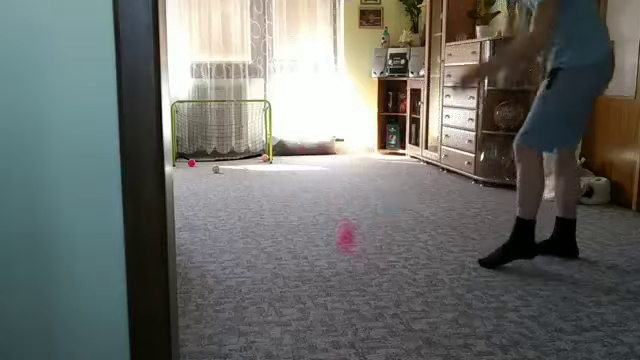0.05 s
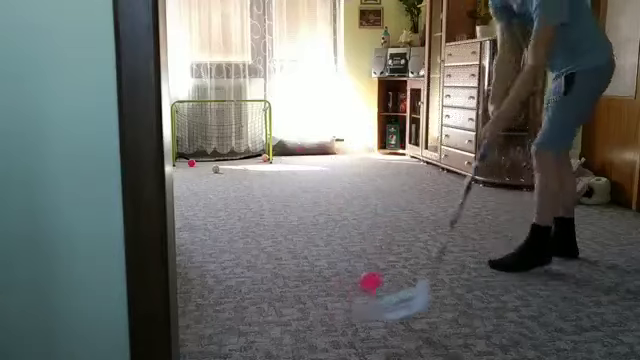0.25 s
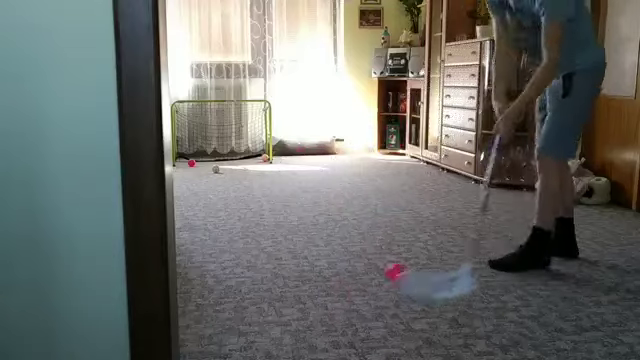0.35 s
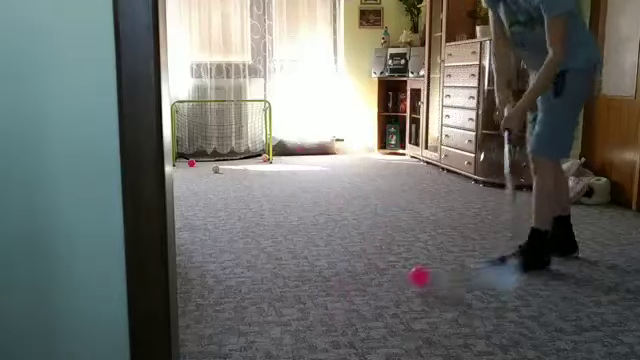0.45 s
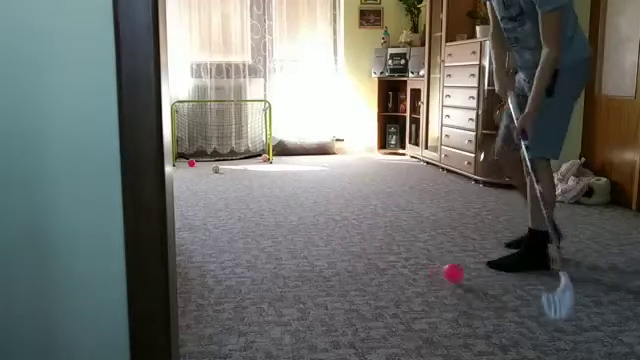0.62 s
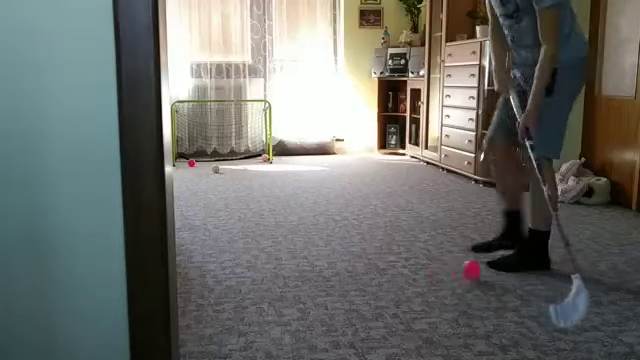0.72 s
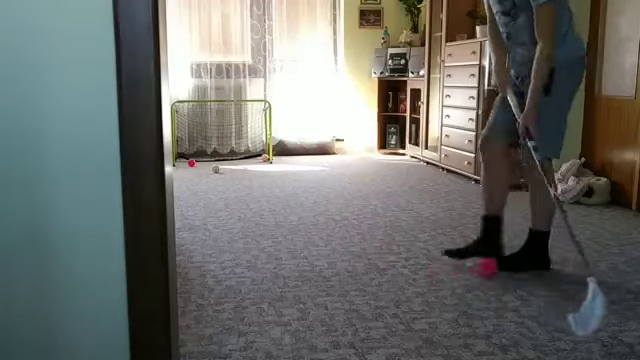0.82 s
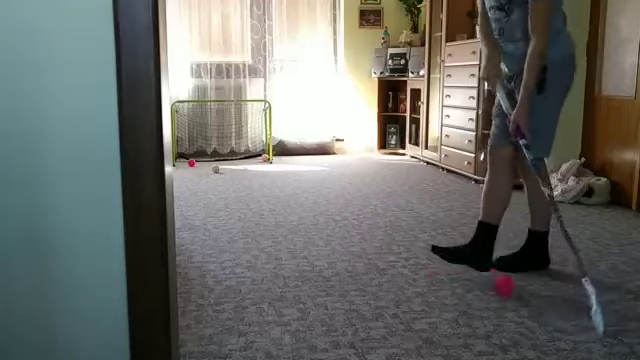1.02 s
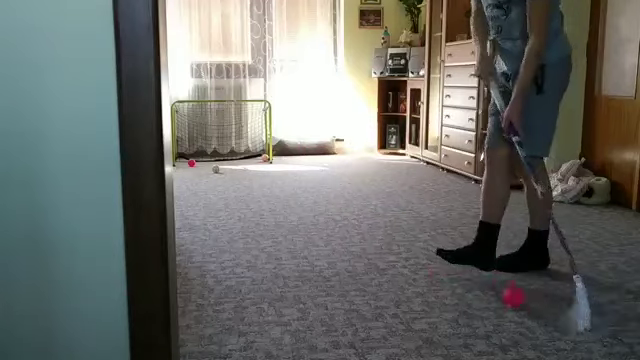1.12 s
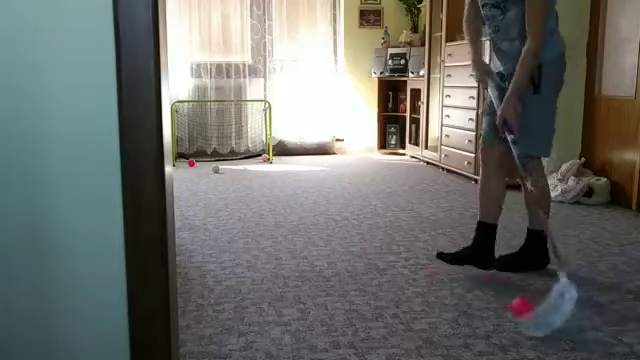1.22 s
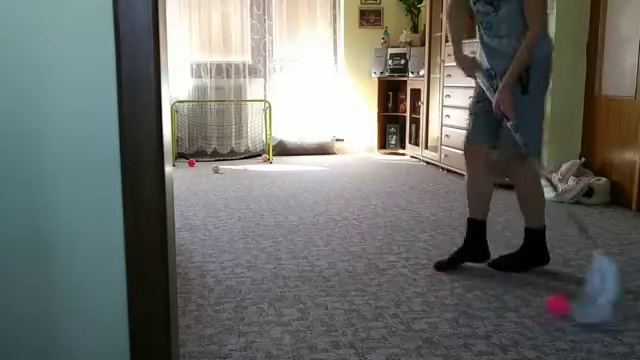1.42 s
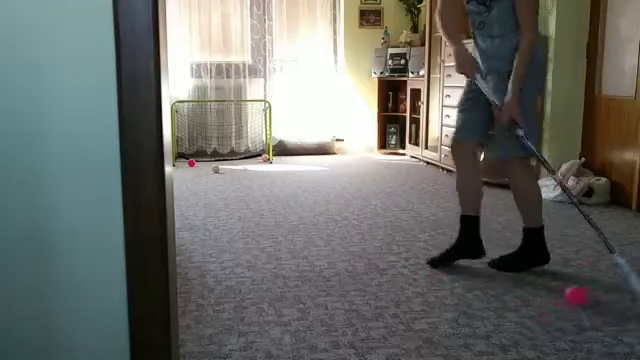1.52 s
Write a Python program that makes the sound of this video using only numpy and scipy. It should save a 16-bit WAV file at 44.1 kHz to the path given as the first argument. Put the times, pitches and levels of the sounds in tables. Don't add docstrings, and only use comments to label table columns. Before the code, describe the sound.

A plastic stick blade thuds on carpet and sharply cracks a light hollow ball; socked feet pad and scuff, then a far quieter tap follows, in a furnished living room, heard from a few metres by a phone.

```python
import sys
import numpy as np
from scipy import signal
from scipy.fft import rfft, irfft
from scipy.io import wavfile
from scipy.ndimage import uniform_filter1d

SR = 44100
rng = np.random.default_rng(int(sys.argv[2]) if len(sys.argv) > 2 else 0)


def ratio_of_db(decibels):
    return 10 ** (np.asarray(decibels, float) / 20)


def wrap_up_sound(samples):
    columns = np.atleast_2d(samples).T
    tamed = np.clip(columns, -1, 1)
    steps = np.round(tamed * 32767).astype(np.int16)
    wavfile.write(sys.argv[1], SR, steps)


N = 68355

CRACK_S, TAP_S = .2616, 1.3946
BALL_PAN_DB = 6


def curve(table, hz):
    table = np.array(table, float)
    return np.interp(np.log(np.maximum(hz, 1)), np.log(table[:, 0]), table[:, 1])


def level(x, db):
    return x * ratio_of_db(db) / np.sqrt(np.mean(x ** 2))


def colour(table, size=4096):
    half = size // 2
    log_gain = curve(table, np.arange(half + 1) * SR / size) * np.log(10) / 20
    cepstrum = irfft(log_gain)
    cepstrum[1:half] *= 2
    cepstrum[half + 1:] = 0
    click = irfft(np.exp(rfft(cepstrum)))[:half]
    return click / np.abs(click).max()


def shaped(x, table):
    return irfft(rfft(x) * ratio_of_db(curve(table, np.arange(N // 2 + 1) * SR / N)), N)


def place(x, s):
    y = np.zeros(N)
    y[:len(x)] = x
    return irfft(rfft(y) * np.exp(-2j * np.pi * np.arange(N // 2 + 1) * s * SR / N), N)


def pan(db):
    return ratio_of_db(np.array([[db], [-db]]) / 2)


def walk(rate):
    hold = int(SR / rate)
    steps = np.repeat(rng.standard_normal(N // hold + 1), hold)
    return 1.3 * uniform_filter1d(uniform_filter1d(steps, hold), hold)[:N]


# (frequency [Hz], correlation [-1 to 1])
ROOM_LIKENESS = [(60, 0.73), (250, 0.93), (500, 0.62), (1000, 0.3), (2000, 0.038), (16000, 0.065)]


def bands(likeness=None):
    f = np.maximum(np.arange(N // 2 + 1) * SR / N, 1)
    steady_top_hz = 15050
    mid, side = rfft(rng.standard_normal((2, N))) * (f < steady_top_hz)
    for hz in 22 * 2 ** np.arange(0, 10, .5):
        c = np.clip(curve(ROOM_LIKENESS, hz) if likeness is None else likeness, -1, 1)
        pair = np.sqrt((1 + c) / 2) * mid + np.sqrt((1 - c) / 2) * side * np.array([[1], [-1]])
        window = np.cos(np.pi / 2 * np.clip(2 * np.log2(f / hz), -1, 1)) ** 2
        yield hz, irfft(pair * window, N)


# (frequency [Hz], level when cracked [dB], level when tapped [dB], T60 [s])
BALL_MODES = [(499.3, -23.5, -33, .1), (1161, -20.5, -28, 0.049), (2550, -18, -8, .012),
              (3770, -8, -4.5, 0.0049), (4600, -13, -11, 0.0066), (6075, -6, -32, 0.01),
              (8030, -9.5, -4, 0.011), (8710, 0.5, 1, 0.0052), (9550, -8.5, 1, 0.0082)]


def ball_ring(db, column):
    t = np.arange(SR // 5) / SR
    ring = 0
    for mode in BALL_MODES:
        ring = ring + ratio_of_db(mode[column] - 60 * t / mode[-1]) * np.sin(2 * np.pi * mode[0] * t)
    return ratio_of_db(db) * ring


def knock(spectrum, ring_db, column):
    x = ball_ring(ring_db, column)
    click = colour(spectrum)
    x[:len(click)] += click
    return x


# (frequency [Hz], level [dB])
CRACK_SPECTRUM = [(300, -30.5), (800, -8), (2500, -2.5), (3100, -3), (4300, 4), (8800, 3), (12000, 1),
                  (16500, -20)]


def crack():
    return ratio_of_db(-8) * place(knock(CRACK_SPECTRUM, -13.5, column=1), CRACK_S)


# (frequency [Hz], level [dB])
TAP_SPECTRUM = [(90, -29.5), (300, -12), (1030, -8), (1750, -10.5), (4000, -8), (8500, -8), (12000, -8),
                (16500, -27)]


def tap():
    return ratio_of_db(-23.5) * place(knock(TAP_SPECTRUM, -15, column=2), TAP_S)


# (frequency [Hz], level [dB])
SNAP_SPECTRUM = [(1500, -25), (3500, -1), (7500, 5), (12000, -1), (16500, -11)]


def snap():
    edge = colour(SNAP_SPECTRUM)
    x = ratio_of_db(-3) * place(edge, CRACK_S) + ratio_of_db(-26) * place(edge, TAP_S)
    return x * pan(BALL_PAN_DB)


def cavity():
    t = np.arange(SR // 2) / SR
    pitch_hz, rise_s, t60_s = 1045, .005, .16
    waver = .4 * walk(50)[:len(t)]
    hum = np.sin(2 * np.pi * pitch_hz * t + waver)
    hum *= (1 - np.exp(-t / rise_s)) * ratio_of_db(-60 * t / t60_s)
    return ratio_of_db(-40) * place(hum, CRACK_S) + ratio_of_db(-37) * place(hum, TAP_S)


# (frequency [Hz], level [dB])
THUD_SPECTRUM = [(30, -34), (75, -16), (150, -14.5), (260, -2), (400, -3), (540, 1.5), (1000, -12.5),
                 (1600, -16.5), (2100, -24.5), (5000, -63)]


def thud():
    touch_s, rebound_delay_s, rebound_db = .2398, .001745, 9
    dull = colour(THUD_SPECTRUM)
    push = ratio_of_db(rebound_db) * place(dull, touch_s + rebound_delay_s)
    return ratio_of_db(-22) * (push - place(dull, touch_s)) / 2


# (frequency [Hz], level [dB])
WHISTLE_SPECTRUM = [(1800, -30), (2200, -7), (2330, 0), (2460, -7), (3000, -30)]


def whistle():
    t = np.arange(N) / SR
    centre_s, spread_s = .19, .03
    tone = shaped(rng.standard_normal(N), [(20, -90)] + WHISTLE_SPECTRUM + [(9000, -90)])
    return level(tone, -60) * np.exp(-((t - centre_s) / spread_s) ** 2)


# (time [s], level [dB])
FOOTFALLS = [(.11, -48), (0.174, -48), (.53, -45), (.575, -60), (.61, -53.5), (.695, -44.5), (0.769, -60.5),
             (.85, -58), (.948, -46), (1.288, -55), (1.458, -46.5)]
# (frequency [Hz], level [dB])
FOOT_SPECTRUM = [(40, -1), (90, 4), (300, -3), (700, -4.5), (1300, -16), (2500, -59), (6000, -97)]


def footsteps():
    return sum(ratio_of_db(db) * place(colour(FOOT_SPECTRUM), s) for s, db in FOOTFALLS)


# (start [s], rise [s], hold [s], fall T60 [s], level [dB])
BRUSH_STROKES = [
    (0, 0.00054, .03, 0.56, -55),
    (0.072, 0.031, 0.032, 0.26, -59),
    (0.129, 0.06, 0.14, 0.19, -48.5),
    (0.496, 0.026, .01, 1, -55.5),
    (.878, 0.014, 0.049, 0.83, -55.5),
    (0.941, .01, 0.07, 0.3, -58.5),
    (1.264, 0.02, 0.065, 0.34, -61.5),
    (1.488, 0.026, .05, .3, -50.5),
]
# (frequency [Hz], level [dB])
BRUSH_SPECTRUM = [(300, -2), (1200, -0.5), (2400, 4.5), (3200, -2), (8000, 2), (11000, 0), (14700, -7.5)]


def brushes():
    t, power = np.arange(N) / SR, 0
    for start, rise, hold, fall, db in BRUSH_STROKES:
        falling = np.maximum(t - start - rise - hold, 0)
        swell = np.clip((t - start) / rise, 0, 1) ** 2
        power = power + ratio_of_db(2 * db - 120 * falling / fall) * swell
    hiss = sum(b * ratio_of_db(curve(BRUSH_SPECTRUM, hz) + 1.6 * walk(25.14)) for hz, b in bands(.1))
    grain_db = 1
    return np.sqrt(power) * level(hiss * ratio_of_db(grain_db * walk(300)), 0)


# (frequency [Hz], level [dB per Hz])
RUMBLE_SPECTRUM = [(12, -17), (20, 9), (43, -15), (91, -8), (172, -16.5), (301, -12), (387, -13),
                   (566, -16.5), (1500, -24), (1950, -54), (3300, -120)]
# (frequency [Hz], level [dB per Hz])
HISS_SPECTRUM = [(700, -25), (1500, -3.5), (3700, -4), (4350, 4.5), (5500, -8), (8000, -3.5), (11300, 0),
                 (12500, -9.5), (15000, -5.5)]
# (frequency [Hz], rms level [dB])
HUM_TONES = [(301, -72), (587, -74), (1297, -78.5), (1820, -85)]


def background():
    t, swell = np.arange(N) / SR, walk(3.8)
    swell_db, flicker_db = 1, 2
    rumble = sum(b * ratio_of_db(swell_db * swell + flicker_db * walk(11.67)) for hz, b in bands())
    hiss = sum(b * ratio_of_db(2.4 * walk(10.56)) for hz, b in bands(0))
    hum = sum(ratio_of_db(db) * np.sqrt(2) * np.sin(2 * np.pi * f * t + walk(5.83)) for f, db in HUM_TONES)
    return level(shaped(rumble, RUMBLE_SPECTRUM), -59) + level(shaped(hiss, HISS_SPECTRUM), -61) + hum


# (frequency [Hz], T60 [s])
ROOM_DECAY = [(60, 0.72), (170, 0.58), (400, 0.49), (1000, 0.52), (2700, 0.39), (5500, 0.34), (11000, 0.26),
              (16000, 0.27)]
# (frequency [Hz], left over right [dB])
ROOM_LEAN = [(60, 2), (250, -1), (1000, -3.5), (4000, -2), (8000, 0.5), (14000, 1.5)]


def room(x, wet_db, pan_db, near_db=-14.5, build_s=.017):
    t = np.arange(N) / SR
    tail = 0
    for hz, b in bands():
        tail = tail + b * ratio_of_db(-60 * t / curve(ROOM_DECAY, hz)) * pan(curve(ROOM_LEAN, hz))
    sparse_db, sparse_s = 4, .032
    lumps = ratio_of_db(sparse_db * np.exp(-t / sparse_s) * np.array([walk(900), walk(900)]))
    echo = tail * lumps * np.sqrt(1 - np.exp(-t / build_s)) * ratio_of_db(wet_db)
    first_echo_s, near_t60_s = .0001, .011
    near = ratio_of_db(near_db - 60 * t / near_t60_s) * rng.standard_normal((2, N)) * (t > first_echo_s)
    near[:, 0] = 1
    near[1] = np.roll(near[1], shift=3)
    echo += near * pan(pan_db)
    return signal.fftconvolve(x[None], echo, axes=1)[:, :N]


def scene():
    soft_near_db = -30
    mix = room(crack(), -14, BALL_PAN_DB)
    mix += room(tap(), -16, BALL_PAN_DB, build_s=.004)
    mix += snap()
    mix += room(cavity(), -36, 0, soft_near_db)
    mix += room(thud(), -20.5, 1.5, soft_near_db, build_s=.005)
    mix += whistle()
    mix += room(footsteps(), -20.5, 0, soft_near_db)
    return mix + brushes() + background()


def thin(x):
    from_hz, sharpening = 1600, 1.1
    gap_share, gap_db, gap_hz, gap_s = .12, -13, 215, .06
    f, t, z = signal.stft(x, SR, nperseg=1024, noverlap=768)
    power = np.abs(z) ** 2 + 1e-18
    local = uniform_filter1d(power, size=9, axis=1)
    gain = np.minimum(power / local, 1.5) ** (sharpening / 2)
    gain *= np.sqrt(local / uniform_filter1d(power * gain ** 2, size=9, axis=1))
    draw = rng.random((int(SR / 2 / gap_hz) + 1, int(t[-1] / gap_s) + 2))
    rows = (f / gap_hz).astype(int)
    cols = (t / gap_s + rng.random(len(draw))[rows][:, None]).astype(int)
    gain *= np.where(draw[rows[:, None], cols] < gap_share, ratio_of_db(gap_db), 1)
    treble = power[:, f > from_hz].sum(axis=(0, 1))
    gain[:, :, treble > 4 * np.roll(treble, shift=4)] = 1
    gain[:, f < from_hz] = 1
    return signal.istft(z * gain, SR, nperseg=1024, noverlap=768)[1][:, :N]


def band_limit(x):
    return signal.sosfilt(signal.butter(12, 16800, fs=SR, output="sos"), x)


def record(dry):
    squeeze_db, squeeze_ratio, squeeze_s = -17.5, 1.5, .03
    k = np.exp(-1 / (squeeze_s * SR))
    loudness = np.sqrt(signal.lfilter([1 - k], [1, -k], np.mean(dry ** 2, axis=0)))
    x = dry * np.minimum(1, ratio_of_db(squeeze_db) / (loudness + 1e-9)) ** (1 - 1 / squeeze_ratio)
    ceiling = .75
    x = ceiling * np.tanh(x / ceiling)
    mid_side = np.array([[1, 0.96], [1, -1.065]]) / np.sqrt(2)
    x = mid_side @ thin(mid_side @ x)
    top_cut = signal.ellip(8, .2, 70, 16700, fs=SR, output="sos")
    low_cut = signal.butter(2, 32, "high", fs=SR, output="sos")
    x = signal.sosfilt(low_cut, signal.sosfilt(top_cut, x))
    return band_limit(x)


dry = scene()
out = record(dry)
wrap_up_sound(out)
```